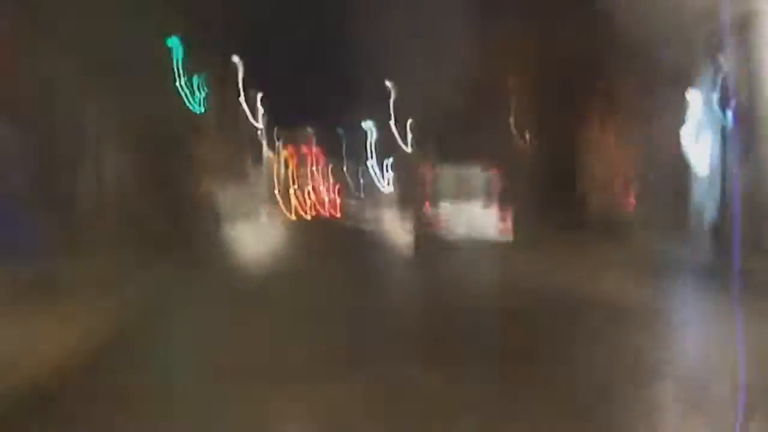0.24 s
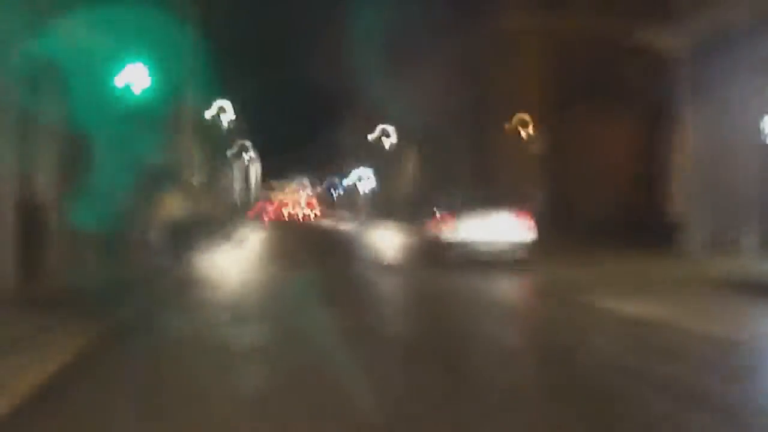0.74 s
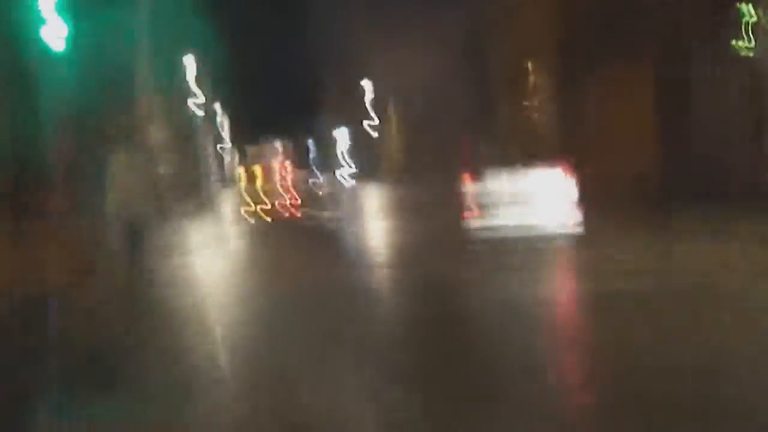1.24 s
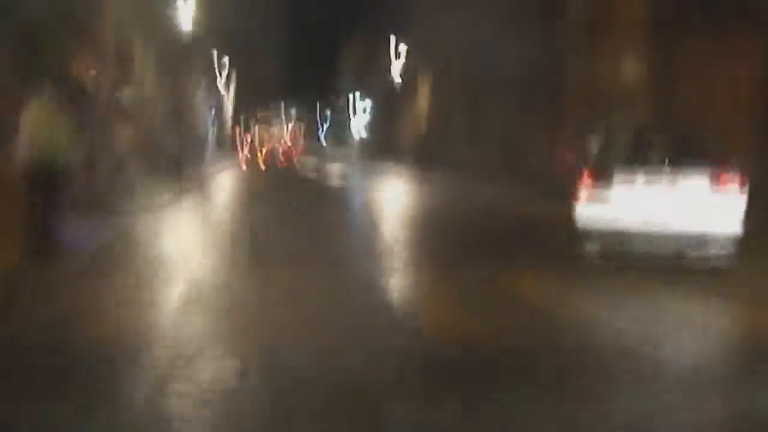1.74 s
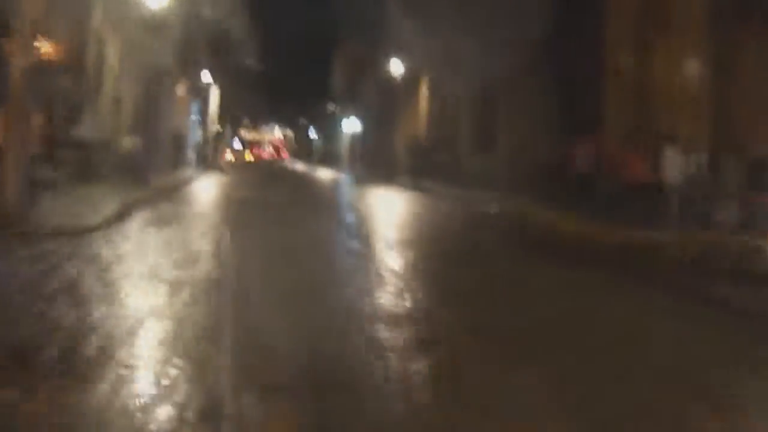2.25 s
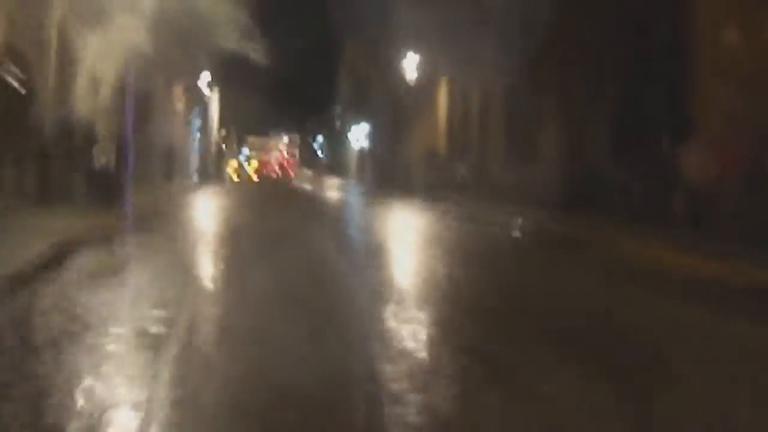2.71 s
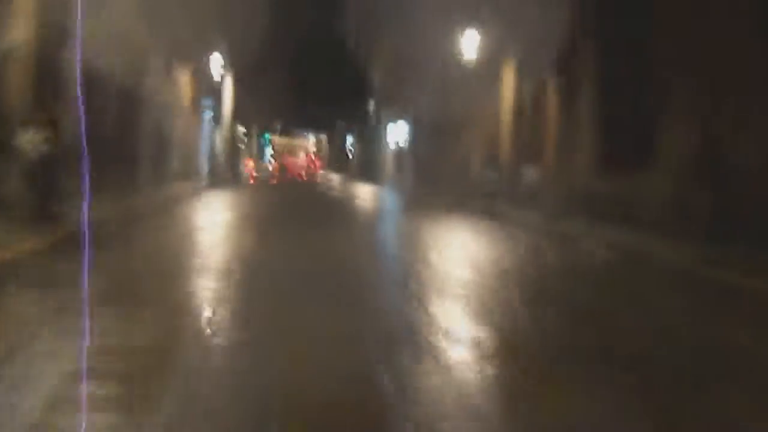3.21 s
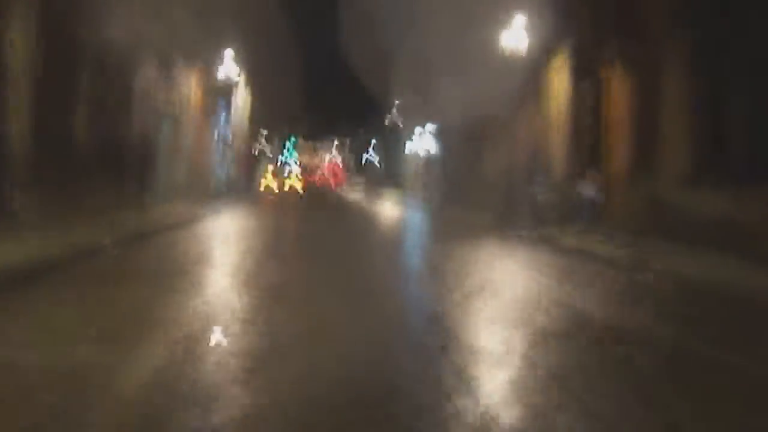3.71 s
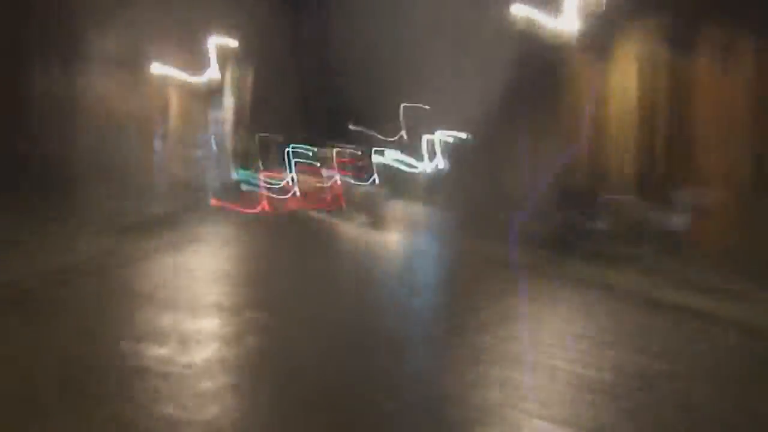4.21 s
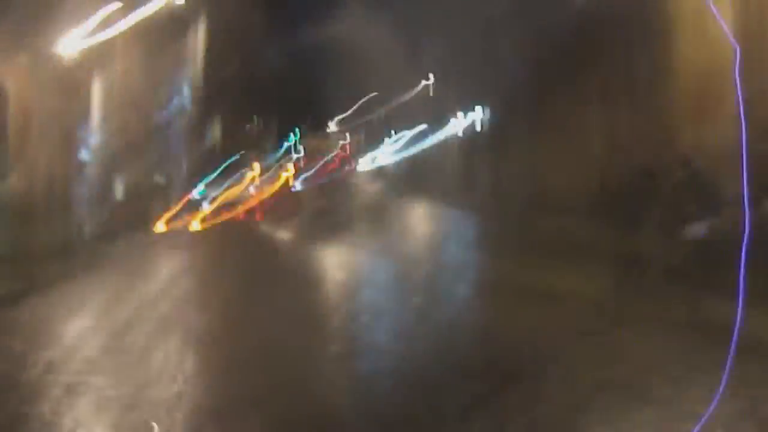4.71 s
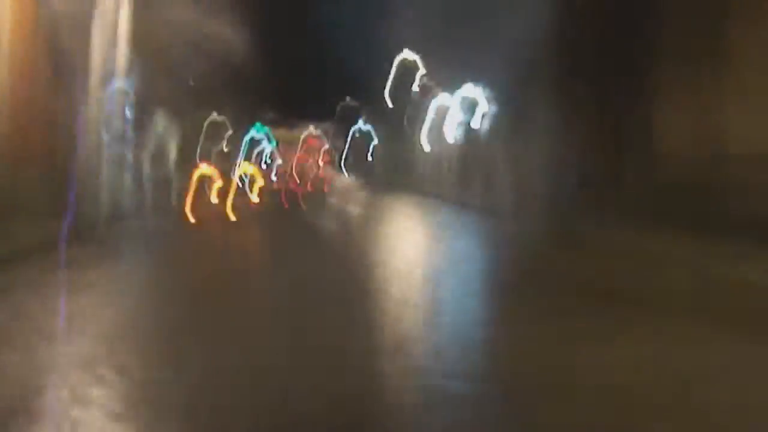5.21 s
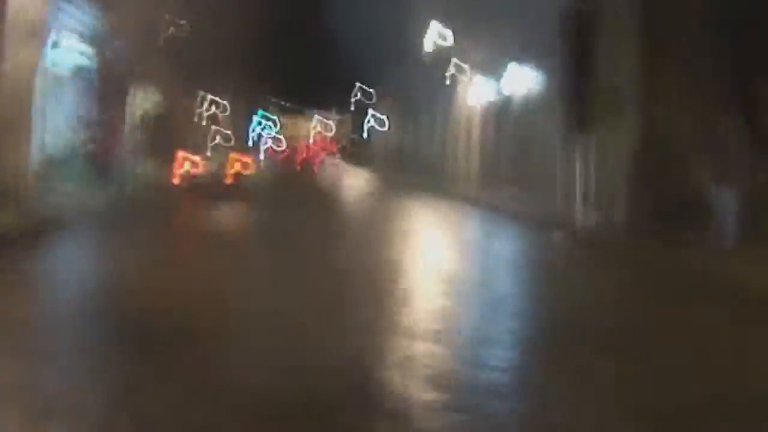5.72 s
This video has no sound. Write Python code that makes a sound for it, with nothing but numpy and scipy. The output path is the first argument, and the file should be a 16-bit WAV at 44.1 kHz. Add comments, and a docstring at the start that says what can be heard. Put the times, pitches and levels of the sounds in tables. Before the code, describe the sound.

Outdoors on a wet street, heard from a small moving motorcycle with one close microphone in the airflow. Wind dominates for the whole six seconds: a hollow, lumpy low-mid roar with muffled rumble, constantly fluttering, broken by short gusts, sudden lulls and soft slapping thumps. It is choppy in the first second, jolts strongly around 1.5, swells fuller and duller from about 2.2 to 2.8, then turns thinner and brighter with surges near 3.5. Another push comes at 4.3 to 5.1, with very brief gaps around 4.9. Nearly buried beneath is a dull engine purr of about fifty pulses a second, sagging slightly after 5.2. Tyres hiss through water with fine crackling spray, stronger near 1.7 and 5.2. Drops tick on the housing, clustering around 1.5, 2 and 4; harder snaps land at 4.75, 5.1 and loudest at 5.4, with a soft splat at 5.9. A faint airy whistle hides underneath.

```python
"""Wet street from the saddle

A small motorcycle rides down a wet street, with one microphone close by, out in the airflow.
Wind, coloured noise with gusts, lulls and slapping eddies, nearly buries the engine's filtered pulses.
Tyre hiss and spray are noise with a crackle of droplets. Drops tick on the microphone's housing
as short filtered clicks, and the air whistles faintly as noise through a narrow resonance."""
import sys
import numpy as np
from scipy import signal
from scipy.fft import rfft, irfft
from scipy.io import wavfile
from scipy.ndimage import uniform_filter1d

SR = 44100
rng = np.random.default_rng(int(sys.argv[2]) if len(sys.argv) > 2 else 0)


def unload_audio(sound):
    """Save the sound as a 16-bit wav file, at the path given as the first command line argument."""
    columns = np.transpose(np.atleast_2d(sound))
    # keep every value between -1 and 1, then stretch to whole-number steps
    steps = np.round(np.clip(columns, -1, 1) * 32767)
    wavfile.write(sys.argv[1], SR, steps.astype(np.int16))


N = 262395

# steady airflow over the microphone, before trims: (t/s, roar level/dB, rush level against roar/dB)
AIRFLOW = [(0.0, -17.5, -5), (0.5, -16, -11), (0.95, -16.5, -8), (1.5, -19.5, -7.5), (2.0, -18.5, -9.5),
           (2.25, -15, -12.5), (2.75, -15.5, -9.5), (3.1, -19.5, -3.5), (3.38, -16, -4.5),
           (3.55, -18, -1.5), (3.85, -18, -6), (4.35, -16, -5), (4.65, -16.5, -9), (5.3, -20.5, -2.5),
           (5.7, -18.5, -6), (5.95, -15.5, -7)]
# low rumble of the wind: (t/s, level/dB)
RUMBLE_LEVEL = [(0, -27), (1.5, -27.5), (2.25, -24.5), (2.8, -27.5), (3.55, -28.5), (4.35, -28), (4.7, -26),
                (5.3, -28.5), (5.75, -24.5), (5.95, -27)]
# surges of the air: (middle t/s, length at half the swing t/s, rise in level/dB)
GUSTS = [(0.088, 0.04, 3.5), (0.254, 0.0083, 3.5), (0.44, 0.015, 2), (0.553, 0.02, 2), (0.637, 0.016, 2.5),
         (0.78, 0.023, 4), (1.02, 0.065, 2.5), (1.345, 0.14, 4), (1.406, 0.017, 2.5), (1.497, 0.018, 5),
         (1.578, 0.027, 6), (1.835, 0.061, 3), (1.899, 0.019, 2.5), (2.229, 0.051, 1), (2.45, 0.025, 2),
         (2.741, 0.036, 1), (2.857, 0.026, 4), (3.346, 0.018, 3.5), (3.462, 0.037, 5), (3.52, 0.06, 5),
         (3.64, 0.038, 1.5), (3.682, 0.016, 3.5), (3.822, 0.03, 3.5), (4.056, 0.052, 2.5),
         (4.349, 0.038, 3.5), (4.56, 0.018, 3), (4.854, 0.028, 4.5), (5.09, 0.053, 5), (5.17, 0.017, 3)]
# moments when the air falls away: (middle t/s, length at half the swing t/s, negative change in level/dB)
LULLS = [(0.148, 0.037, -7.5), (0.235, 0.019, -2.5), (0.274, 0.013, -10), (0.34, 0.11, -2),
         (0.462, 0.064, -3.5), (0.607, 0.039, -3), (0.678, 0.02, -3), (0.746, 0.016, -3.5),
         (0.971, 0.024, -5.5), (1.115, 0.098, -2.5), (1.437, 0.05, -7), (1.518, 0.015, -4.5),
         (1.556, 0.022, -8), (1.622, 0.055, -4.5), (1.79, 0.041, -6), (1.921, 0.011, -8),
         (1.997, 0.017, -3), (2.082, 0.038, -5.5), (2.312, 0.047, -4), (2.348, 0.025, -8.5),
         (2.573, 0.011, -8), (2.926, 0.052, -2.5), (3.21, 0.035, -2.5), (3.42, 0.023, -6),
         (3.593, 0.048, -3.5), (3.731, 0.066, -7), (3.911, 0.045, -2.5), (4.018, 0.038, -3),
         (4.204, 0.027, -9), (4.396, 0.017, -7), (4.514, 0.057, -3), (4.78, 0.017, -5), (4.83, 0.013, -6.5),
         (4.898, 0.0091, -16), (4.956, 0.014, -7.5), (5.141, 0.021, -5), (5.194, 0.032, -8.5),
         (5.368, 0.012, -6), (5.587, 0.024, -8.5), (5.795, 0.019, -10), (5.82, 0.088, -5)]
# single eddies slapping the microphone: (middle t/s, peak level before trim/dB)
BUFFETS = [(0.069, 1), (0.103, -6), (0.1975, 1), (0.2616, -2.5), (0.4408, -0.5), (0.516, -8), (0.555, -3),
           (0.6386, -4), (0.7125, -6), (0.8455, -5), (0.8763, -2.5), (1.1706, -2.5), (1.239, -7),
           (1.4085, -7), (1.499, 2.5), (1.5798, -2.5), (1.7659, -3), (1.8258, -3.5), (1.8994, -3),
           (1.968, -5), (2.0222, -2), (2.0541, -3), (2.152, -0.5), (2.3285, -2), (2.3661, -10),
           (2.6665, -4), (2.9779, -0.5), (3.0287, -2), (3.114, -2.5), (3.243, -3), (3.4562, -11),
           (3.5637, 2.5), (3.6858, -3), (3.9733, 1.5), (4.1311, -0.5), (4.3516, -6), (4.4588, -2),
           (4.615, -2), (4.6714, -5.5), (4.9417, -1), (4.9866, -4), (5.17, -2), (5.246, -2.5), (5.2743, -1),
           (5.3529, -5), (5.4522, -1), (5.7319, -0.5)]
# engine speed: (t/s, mean firing rate f/Hz)
FIRING_RATE = [(0, 51.3), (1.9, 50.4), (2.4, 51.4), (5.2, 49), (5.95, 45)]
# water under the tyres, before trims: (t/s, hiss level/dB, fine spray level/dB)
ROAD_WATER = [(0.0, -38.5, -47.5), (1.09, -38, -50.5), (1.72, -35, -45), (2.43, -39, -51), (2.97, -37, -51),
              (3.71, -39.5, -51), (3.99, -36.5, -50), (4.87, -35.5, -45), (5.25, -34, -50.5),
              (5.65, -38, -53), (5.95, -37.5, -42.5)]
# big drops on the housing: (t/s, level over a millisecond before trim/dB, hardness from 0 to 1)
DROPS = [(0.0414, -32.5, .9), (0.096, -29.5, 0), (0.155, -26, 0.7), (0.159, -29, 0.5), (0.2545, -28, 0),
         (0.3073, -24.5, 0), (0.398, -25.5, 0), (0.445, -26.5, 0.6), (0.5463, -26.5, .2), (1.104, -26, 0.1),
         (1.232, -29, .1), (1.274, -28, 0), (1.356, -25, .2), (1.364, -31, .8), (1.382, -25, .3),
         (1.499, -23.5, 0.3), (1.514, -27, .9), (1.5512, -23.5, 0.9), (1.5745, -22, 0.5), (1.5766, -28, .5),
         (1.5912, -26, 1), (1.632, -29, .4), (1.668, -23.5, 0.8), (1.7265, -31, 0.3), (1.7423, -35, 0.8),
         (1.835, -29, .1), (1.952, -26, .3), (1.9695, -23, 0), (2.029, -32, 0.8), (2.1183, -26, .2),
         (2.127, -29, 0.9), (2.133, -25.5, .1), (2.481, -36, 0), (2.721, -30, .1), (2.74, -30, .3),
         (2.868, -32, .2), (2.9385, -28, 0), (3.0275, -28, 0), (3.2102, -29, 0), (3.5222, -30, 0.5),
         (3.5605, -36, .9), (3.685, -30, 0), (3.745, -31, .8), (3.8394, -25, 0.5), (3.8857, -28, .7),
         (3.91, -23.5, 0.5), (3.923, -27, 0.8), (4.0252, -23, 0.3), (4.1997, -27, .7),
         (4.2328, -23.5, 0.86), (4.335, -28, .1), (4.4347, -23, 0.1), (4.5253, -24, 0.4), (4.546, -24, .1),
         (4.593, -28, 0.1), (4.6365, -30, .2), (4.7462, -16.5, 0.3), (4.815, -28, 0), (4.8496, -29, 0),
         (4.873, -20.5, 0.34), (5.039, -31, .3), (5.088, -17.5, 0.57), (5.091, -26, 0.3), (5.097, -29, .6),
         (5.169, -31, 0), (5.247, -26.5, 0), (5.3, -26, .3), (5.324, -28, 0), (5.3861, -10.5, 0.66),
         (5.3942, -31, .6), (5.4445, -26.5, 0), (5.617, -28, 0), (5.9364, -18.5, 0.04)]

# relative spectra of the wind's main, low and bright parts: (f/Hz, level per Hz/dB)
ROAR_SPECTRUM = [(150, -20), (250, -10), (330, -3.5), (420, -1.5), (560, 0), (800, -0.5), (1050, -5),
                 (1400, -14.5), (2200, -32)]
RUMBLE_SPECTRUM = [(20, -50), (40, -52), (58, -23.5), (85, -16.5), (145, -6), (200, -3.5), (320, 2),
                   (450, 0.5), (800, -57)]
RUSH_SPECTRUM = [(650, -20), (950, 1), (1200, 2), (1500, -4.5), (1900, -12), (2500, -23), (4000, -47)]
# relative spectra of tyre hiss and fine spray: (f/Hz, level per Hz/dB)
HISS_SPECTRUM = [(1400, 5.5), (1950, 6), (2350, 9.5), (2850, 1), (3600, 0.5), (5000, -6.5), (6500, -9.5),
                 (9000, -18)]
SPRAY_SPECTRUM = [(3000, -30), (4500, -2), (5800, 9), (7000, -10), (8200, 2), (10300, 2), (12000, -19)]
# relative spectrum of a drop's landing: (f/Hz, soft splat level per Hz/dB, hard snap level per Hz/dB)
SPLASH_SPECTRA = [(700, -9, -11), (1620, 6, 2.5), (2400, 3.5, 2.5), (3630, 5.5, 0), (4500, 0.5, 1),
                  (5960, -7, 0.5), (7900, -17.5, -7), (10150, -19, -9.5)]
# relative spectrum of a tick heard through the housing: (f/Hz, level per Hz/dB)
HOUSING_SPECTRUM = [(900, -19), (1800, 1), (2500, 16), (3400, 19), (4600, 6.5), (5800, 1.5), (8000, 0),
                    (11000, -18)]

GUST_STEEPNESS = 5.1  # 2 is a bell, more has a flatter top and faster flanks
RUSH_FOLLOWS, RUMBLE_FOLLOWS = 0.53, 0.49  # shares of a gust's swing in dB
CENTRE_HZ, CENTRE_OCTAVES_PER_DB = 568, 0.04  # brighter air centres the roar higher
BUFFET_SCATTER_OCTAVES = 0.26
# the stream slackens just ahead of each slapping eddy
CALM_LEAD_S, CALM_LENGTH_S, CALM_DB = 0.016, 0.012, -1.5
CUTOFF_HZ = 11000


def wind(flutter, flutter_db=1.54, lumps=0.78, roar_db=-0.68, rush_db=-2.5, cavity=0.82, cavity_width_hz=380):
    """Turbulence: lumpy noise as roar, rush and rumble; a broad moving resonance stresses the roar."""
    flow_db, bright_db = in_time(AIRFLOW)
    gust_db = gusting()
    roar_level = flow_db + gust_db + roar_db
    rush_level = flow_db + bright_db + RUSH_FOLLOWS * gust_db + rush_db
    rumble_level = in_time(RUMBLE_LEVEL)[0] + RUMBLE_FOLLOWS * gust_db

    # each stream is smooth noise plus separate eddies
    roar_air = rng.standard_normal(N) + lumps * grains(per_s=300, spread_db=4.5)
    stream = rms_one(colour(roar_air, ROAR_SPECTRUM))
    stream = stream + cavity * moving_resonance(stream, roar_centre(), cavity_width_hz)
    roar = from_db(roar_level) * steady(stream)

    rush_air = rng.standard_normal(N) + lumps * grains(per_s=400, spread_db=5.5)
    rush = from_db(rush_level) * steady(colour(rush_air, RUSH_SPECTRUM))

    rumble_air = rng.standard_normal(N) + lumps * grains(per_s=120, spread_db=5.0)
    rumble = from_db(rumble_level) * steady(colour(rumble_air, RUMBLE_SPECTRUM))

    # roar and rush flutter together, the rumble does not
    return (roar + rush) * rms_one(from_db(flutter_db * flutter)) + rumble


def gusting():
    """Swing of the airflow in dB: gusts, lulls and calms come and go with the same rounded shape."""
    t = np.arange(N) / SR
    calms = [(s - CALM_LEAD_S, CALM_LENGTH_S, CALM_DB) for s, _ in BUFFETS]
    swing = np.zeros(N)
    for s, length, db in [*GUSTS, *LULLS, *calms]:
        near = slice(max(0, round((s - 2 * length) * SR)), round((s + 2 * length) * SR))
        distance = np.abs(2 * (t[near] - s) / length)
        swing[near] += db * .5 ** (distance ** GUST_STEEPNESS)
    return swing


def roar_centre():
    """Pitch of the roar in Hz, rising with the brightness of the airflow."""
    _, bright_db = in_time(AIRFLOW)
    return CENTRE_HZ * 2 ** (CENTRE_OCTAVES_PER_DB * (bright_db - bright_db.mean()))


def buffets(cycles=1.0, level_db=-3.5, sharpness=1.066):
    """A strong eddy passes in a few milliseconds: a brief pressure wiggle around the roar's pitch."""
    out = np.zeros(N)
    t = np.arange(-SR // 100, SR // 100) / SR
    centre = roar_centre()
    chances = rng.uniform(-1.05, 1, (len(BUFFETS), 2))
    for (s, db), (turn, scatter) in zip(BUFFETS, chances):
        hz = sharpness * centre[round(s * SR)] * 2 ** (BUFFET_SCATTER_OCTAVES * scatter)
        envelope = 1 / np.cosh(2 * t * hz / cycles)
        wiggle = np.cos(2 * np.pi * hz * t + np.pi * turn) * envelope
        add(out, s + t[0], from_db(db + level_db) * wiggle)
    return out


def engine(rough_db=5, wander=.025, exhaust_db=-35, tick_db=-53):
    """Every firing gives a dull exhaust pulse and a short mechanical tick of uneven strength."""
    rate, = in_time(FIRING_RATE)
    firing_count = np.cumsum(rate * (1 + wander * drift(8))) / SR
    strength = from_db(rough_db * np.tanh(drift(41)))
    firings = np.diff(np.floor(firing_count), prepend=0) * strength
    exhaust = resonance(resonance(firings, 188, 147), 293, 390)
    tick_s = .0005
    tick_decay = signal.lfilter([1], [1, -np.exp(-1 / (tick_s * SR))], firings)
    rattle = tick_decay * rng.standard_normal(N)
    return from_db(exhaust_db) * rms_one(exhaust) + from_db(tick_db) * rms_one(housing(rattle))


def housing(x):
    """The microphone's housing passes the low treble best and hardly rings."""
    return colour(x, HOUSING_SPECTRUM)[:len(x)]


def tyres(flutter, flutter_db=2.6, splash=0.44, hiss_db=-1.16, spray_db=-8.0):
    """Tread squeezes the water film into hiss and a crackle of droplets."""
    hiss_level, spray_level = in_time(ROAD_WATER)
    droplets = splash * grains(per_s=200, spread_db=3.5)
    hiss = steady(colour(rng.standard_normal(N) + droplets, HISS_SPECTRUM))
    spray = steady(colour(rng.standard_normal(N) + droplets, SPRAY_SPECTRUM))
    water = from_db(hiss_level + hiss_db) * hiss + from_db(spray_level + spray_db) * spray
    return water * from_db(flutter_db * flutter)


def drops(level_db=3.25, splash=0.67, droplet=0.39):
    """A hard drop snaps brightly, a soft one smears into a duller splash; both may shed stray droplets."""
    out = np.zeros(N)
    t = np.arange(SR // 40) / SR
    splat_s, droplets_s, droplets_per_s = .001, .009, 250
    for s, db, hardness in DROPS:
        strays = (rng.random(len(t)) < droplets_per_s / SR) * np.exp(-t / droplets_s)
        smear = splash * (1 - hardness) * np.exp(-t / splat_s)
        splat = (t == 0) + (smear + droplet * strays) * rng.standard_normal(len(t))
        tick = colour(splat, splash_spectrum(hardness))[:len(t)]
        # the whole tick's energy, as if spread over one millisecond
        strength = np.sqrt(np.sum(tick ** 2) / (SR / 1000))
        add(out, s, from_db(db + level_db) * tick / strength)
    return out


def drizzle(soft_db=-7.0, hard_db=-1.0):
    """Fine drops, many soft and some hard, tick dryly on the housing, louder where the road is wetter."""
    hiss_level, spray_level = in_time(ROAD_WATER)
    soft = grains(per_s=105, spread_db=3.0)
    hard = grains(per_s=50, spread_db=3.0)
    soft_ticks = rms_one(colour(soft, splash_spectrum(0)))
    hard_ticks = rms_one(colour(hard, splash_spectrum(0.87)))
    return from_db(hiss_level + soft_db) * soft_ticks + from_db(spray_level + hard_db) * hard_ticks


def splash_spectrum(hardness):
    """Colour of a drop, between a soft splat and a hard snap."""
    hz, soft_db, hard_db = np.transpose(SPLASH_SPECTRA)
    return np.transpose([hz, soft_db + hardness * (hard_db - soft_db)])


def whistle(hz=2340, width_hz=150, level_db=-50, waver_db=2.5):
    """Air sings faintly over an edge: noise through two equal resonances, wavering in level."""
    once = resonance(rng.standard_normal(N), hz, width_hz)
    tone = rms_one(resonance(once, hz, width_hz))
    return from_db(level_db + waver_db * drift(9.3)) * tone


def from_db(db):
    """Decibels to gain."""
    return 10 ** (np.asarray(db) / 20)


def rms_one(x):
    """Scale to unit power."""
    return x / np.sqrt(np.mean(x ** 2) + 1e-20)


def steady(x):
    """Unit power over every fortieth of a second, fast grain kept."""
    return x / np.sqrt(uniform_filter1d(x * x, SR // 40) + 1e-12)


def in_time(rows):
    """Each column of a curve at every sample."""
    s, *columns = np.transpose(rows)
    return [np.interp(np.arange(N) / SR, s, c) for c in columns]


def drift(rate_hz):
    """Smooth chance with spread 1: noise through two low-pass poles, made at a twentieth of SR."""
    r = np.exp(-40 * np.pi * rate_hz / SR)
    noise = rng.standard_normal(N // 20 + 2002)
    slow = signal.lfilter([1], [1, -2 * r, r * r], noise)[2000:]  # settled part only
    return np.interp(np.arange(N) / 20, np.arange(len(slow)), rms_one(slow))


def grains(per_s, spread_db):
    """Random clicks of uneven size and either sign; rms 1."""
    born = rng.random(N) < per_s / SR
    sizes = from_db(spread_db * np.minimum(rng.exponential(1, N), 3.5))
    return rms_one(born * sizes * rng.choice([-1, 1], N))


def colour(x, spectrum):
    """Causal (minimum-phase) filter with the given spectrum, falling away beyond its ends."""
    hz, db = np.transpose(spectrum)
    size = 4096
    grid = np.log(np.maximum(np.arange(size // 2 + 1), 1) * SR / size)
    beyond = np.abs(grid - np.clip(grid, np.log(hz[0]), np.log(hz[-1])))
    shape_db = np.interp(grid, np.log(hz), db) - 25 * beyond
    # folding the cepstrum forward in time gives minimum phase
    cepstrum = irfft(np.log(from_db(shape_db)))
    cepstrum[1:size // 2] *= 2
    cepstrum[size // 2 + 1:] = 0
    return signal.fftconvolve(x, irfft(np.exp(rfft(cepstrum))))[:N]


def resonator(hz, width_hz):
    """Filter coefficients of one resonance with a gain of about 1 on top."""
    r = np.exp(-np.pi * width_hz / SR)
    zeros = np.array([1, 0, -1]) * (1 - r * r) / 2
    poles = [1, -2 * r * np.cos(2 * np.pi * hz / SR), r * r]
    return zeros, poles


def resonance(x, hz, width_hz):
    """One fixed resonance."""
    return signal.lfilter(*resonator(hz, width_hz), x + 1e-18)


def moving_resonance(x, hz, width_hz, size=128):
    """A resonance retuned block by block, its state carried on."""
    out, state = np.zeros(N), np.zeros(2)
    for i in range(0, N, size):
        block = slice(i, i + size)
        out[block], state = signal.lfilter(*resonator(hz[i], width_hz), x[block], zi=state)
    return out


def add(out, s, sound):
    """Mix a short sound in at a time."""
    start = max(0, round(s * SR))
    out[start:start + len(sound)] += sound[:max(0, N - start)]


def scene():
    """Everything meets at one microphone; wind and tyres share one flutter."""
    flutter = drift(50.0)
    air = wind(flutter) + buffets() + whistle()
    water = tyres(flutter) + drizzle() + drops()
    return (air + water + engine())[None]


def record(dry):
    """The microphone rounds off the highest peaks, the top is cut."""
    rounded = dry / (1 + (dry / .95) ** 6) ** (1 / 6)
    low_pass = signal.ellip(12, .1, 90, CUTOFF_HZ, fs=SR, output="sos")
    return signal.sosfilt(low_pass, rounded)


dry = scene()
out = record(dry)
unload_audio(out)
```